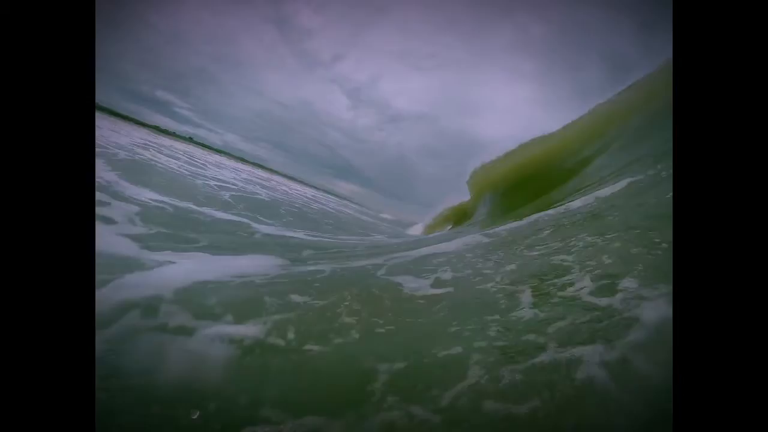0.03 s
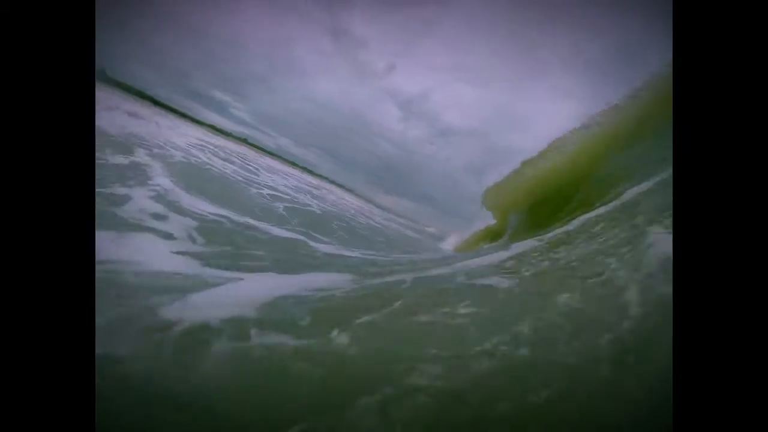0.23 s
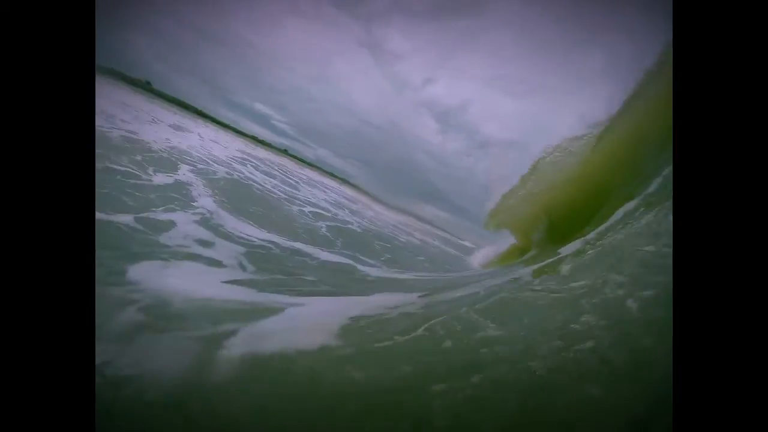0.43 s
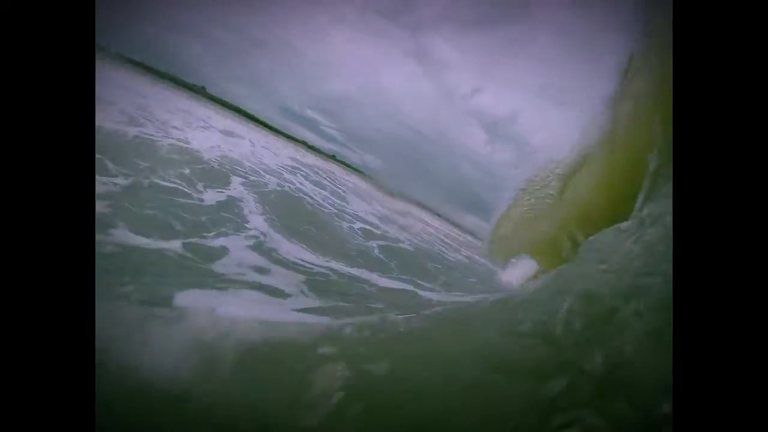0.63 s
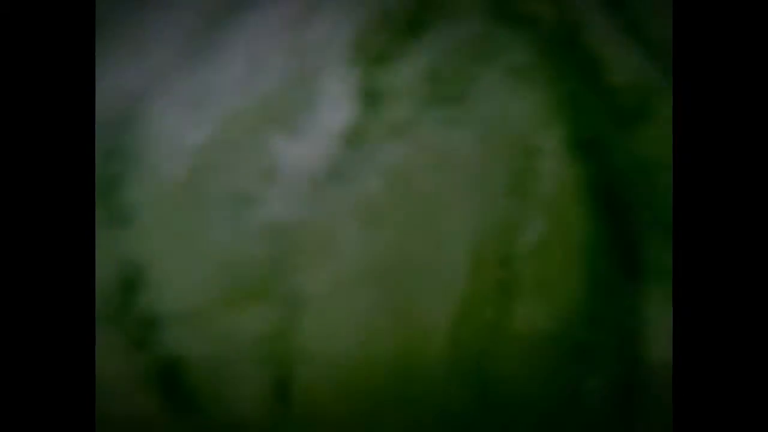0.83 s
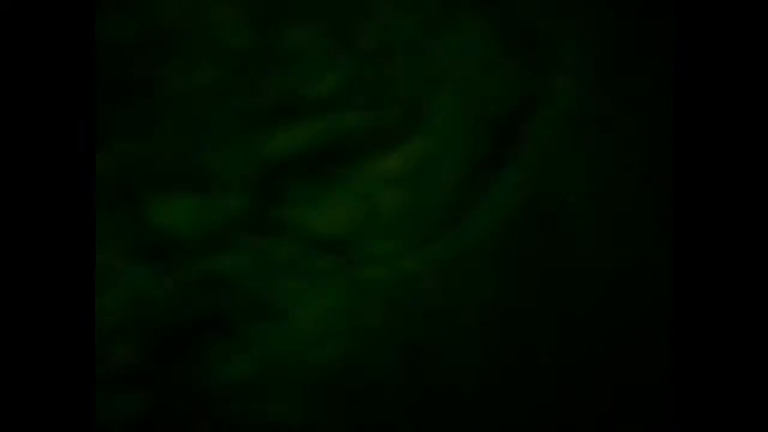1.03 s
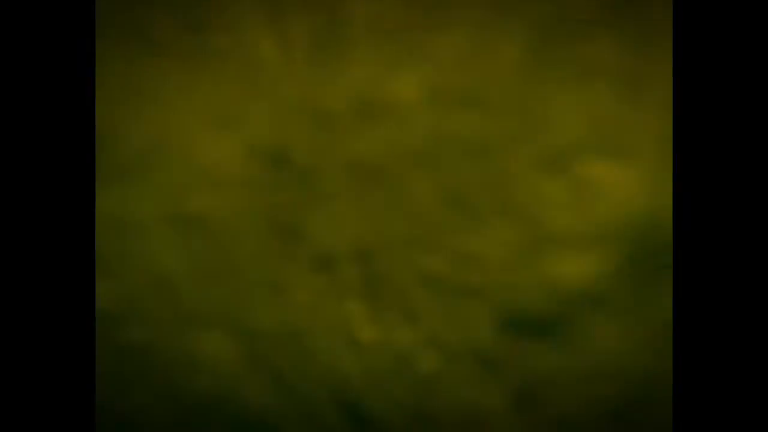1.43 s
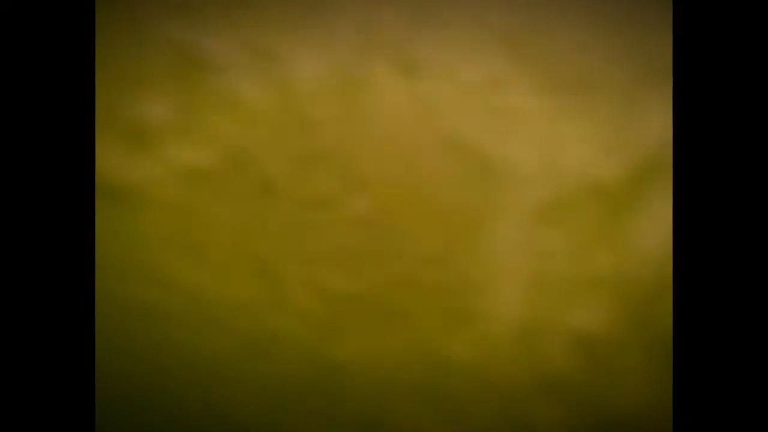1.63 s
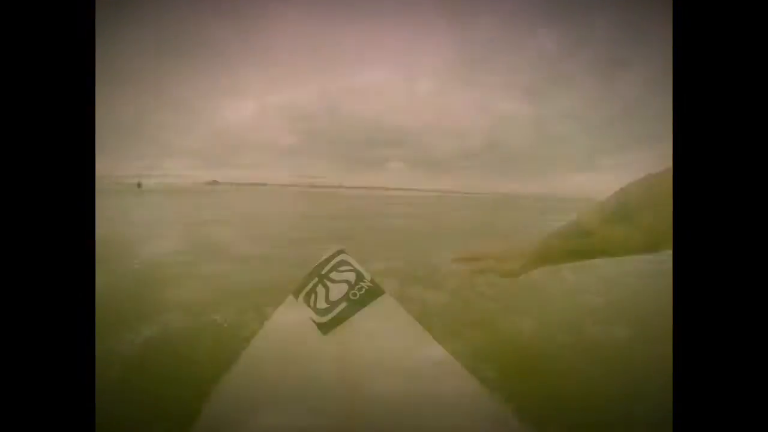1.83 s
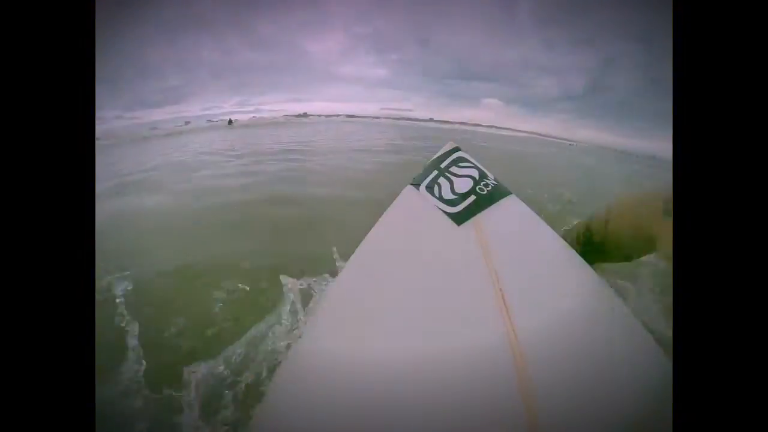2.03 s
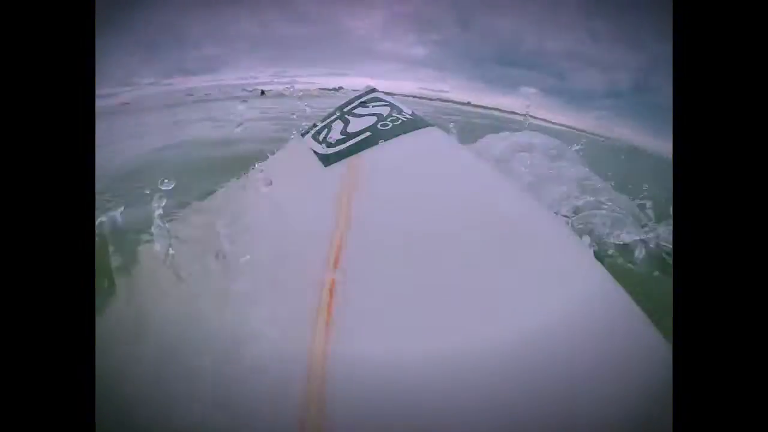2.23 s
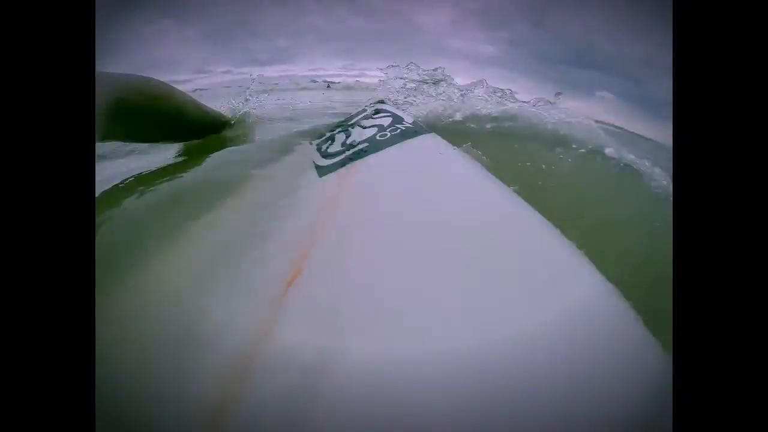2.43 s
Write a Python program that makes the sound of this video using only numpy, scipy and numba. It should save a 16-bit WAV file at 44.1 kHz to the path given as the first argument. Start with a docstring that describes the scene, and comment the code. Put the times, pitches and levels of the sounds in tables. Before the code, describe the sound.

Water rushes and gurgles around a camera on a surfboard. It starts with soft lapping and a slap at 0.25 seconds. From 0.7, sharp slaps hit the case and a muffled, bubbling rush takes over, with a deep boom near 1.1. Big air pockets gurgle from 1.6 to 1.8. After 2 seconds it is quieter at the surface: foam fizzes, drops splash and wind flutters lightly until about 2.6.

```python
"""Surfboard under a wave

A camera in a waterproof case rides a surfboard under a wave and comes up again.
Water laps, slaps the case and closes over it in a muffled rush of ringing bubbles.
Pressure makes the case boom, and big air pockets gurgle as it rises.
In the open air, foam fizzes, drops splash and wind flutters against the case."""
import sys
import numpy as np
from scipy import signal
from scipy.fft import rfft, irfft
from scipy.io import wavfile
from scipy.ndimage import uniform_filter1d
from numba import njit

SR = 44100
rng = np.random.default_rng(int(sys.argv[2]) if len(sys.argv) > 2 else 0)


def generate_wav(sig):
    """Save sig (samples, or channels by samples) to the path in sys.argv[1] as 16-bit PCM at SR."""
    pcm = np.round(np.clip(np.atleast_2d(sig).T, -1, 1) * 32767).astype(np.int16)
    wavfile.write(sys.argv[1], SR, pcm)


N = 114660  # 2.6 s
BASS_EDGE_HZ, TREBLE_EDGE_HZ = 398, 1696
# tone of the spray that goes with slaps and pings: f/Hz, relative level/dB
SPRAY_TONE = [(200, -12.5), (900, 12.5), (2500, -4.5), (4000, -14), (7000, -30)]


def undb(db):
    """Turn decibels into a gain to multiply by."""
    return 10 ** (np.asarray(db) / 20)


def unit(x):
    """Scale a sound to an average strength (rms) of 1."""
    return x / np.sqrt(np.mean(x ** 2))


def curve(rows, column=1):
    """Gain over time, from one dB column of a table."""
    rows = np.array(rows)
    return undb(np.interp(np.arange(N) / SR, rows[:, 0], rows[:, column]))


def freqs():
    """The frequency in Hz of each point of a spectrum."""
    return np.maximum(np.arange(N // 2 + 1) * SR / N, 1)


def below(hz, steepness=6):
    """Filter gains that let through what lies below hz."""
    return 1 / (1 + (freqs() / hz) ** steepness)


def colour(x, tone):
    """Filter a sound by a table of f/Hz, level/dB, then scale it to strength 1."""
    hz, db = np.array(tone).T
    gain = undb(np.interp(np.log(freqs()), np.log(hz), db))
    return unit(irfft(rfft(x) * gain, N))


@njit
def ring(start, hz, cycles, size):
    """Each bubble rings as a fading tone whose pitch rises a little."""
    out = np.zeros(N)
    for k in range(len(start)):
        first = int(start[k])
        decay_samples = cycles[k] * SR / hz[k]
        for i in range(min(int(5 * decay_samples), N - first)):
            age = i / decay_samples
            level = size[k] * np.exp(-age) * (1 - np.exp(-5 * age))
            out[first + i] += level * np.sin(2 * np.pi * cycles[k] * age * (1 + .012 * age))
    return out


def cloud(per_s, cycles, spread_db, top_hz):
    """A swarm of bubbles, equally many in each octave and few of them loud, over churning water."""
    low_hz = 68.53
    churn = rng.standard_normal(N)
    when, pitch, life, size, chance = rng.random((50000, 5)).T
    hz = low_hz * (top_hz / low_hz) ** pitch
    size = undb(-spread_db * np.log(1 - .98 * size)) * hz
    on = chance < per_s * N / SR / len(chance)
    bubbles = ring(when[on] * N, hz[on], cycles * (.5 + life[on]), size[on])
    swarm = unit(bubbles) + undb(-2.5) * churn
    return irfft(rfft(swarm) / np.hypot(1, (low_hz / freqs()) ** 2), N)  # thin out the deepest bass


def pops(per_s, cycles, low_hz, high_hz, db):
    """Lone bubbles ring out of the swarm, each with a clear pitch."""
    when, pitch, size, chance = rng.random((3000, 4)).T
    hz = low_hz * (high_hz / low_hz) ** pitch
    on = chance < per_s * N / SR / len(chance)
    bubbles = ring(when[on] * N, hz[on], np.full(on.sum(), float(cycles)), (size ** 2 * hz)[on])
    return undb(db) * unit(bubbles)


def splashes(rows, spray_tone, rise_s=.0011):
    """Each splash briefly rings an air pocket and throws a spray, finer for a smaller pocket."""
    out = np.zeros(N)
    hiss = colour(rng.standard_normal(N), spray_tone)
    for at, hz, db, decay_s, spray_db in rows:
        near = slice(int((at - .02) * SR), min(int((at + .12) * SR), N))
        t = np.arange(N)[near] / SR - at
        body = undb(db) * pulse(t, rise_s, decay_s)
        tail = undb(db - 7.5) * pulse(t, rise_s, decay_s=.009)
        bend = 1 + .047 * np.tanh(t / decay_s / 2)  # the pitch slides up a little
        spray = signal.lfilter(*signal.butter(2, .6 * hz, "high", fs=SR), hiss[near])
        out[near] += body * np.sin(2 * np.pi * hz * t * bend)
        out[near] += spray * undb(spray_db) * (body + tail)
    return out


def pulse(t, rise_s, decay_s):
    """A level that climbs quickly until t = 0, then dies away."""
    return np.exp(-(np.minimum(t, 0) / rise_s) ** 2 - np.maximum(t, 0) / decay_s)


def muffle(x):
    """Water against the case takes away the highest treble."""
    return irfft(rfft(x) * (undb(-57.5) + below(7400, steepness=30)), N)


def wind():
    """Air flutters against the case once it is out of the water."""
    # tone of the wind, applied twice: f/Hz, relative level/dB
    tone = [(8, -11.5), (44, 1), (60, 0), (90, -10.5), (200, -32), (2000, -59.5)]
    # gusts: t/s, level/dB
    gusts = [(2.0, -68), (2.17, -32.5), (2.25, -37.5), (2.32, -24), (2.45, -33), (2.5, -27), (2.56, -32)]
    eddies = colour(rng.standard_normal(N), tone)
    steadier = eddies / np.sqrt(np.abs(signal.hilbert(eddies)))  # even out chance peaks
    return colour(steadier, tone) * curve(gusts)


def foam():
    """Foam bubbles fizz in the open air behind the wave."""
    # tone of the fizz: f/Hz, relative level/dB
    tone = [(100, -18), (250, -18), (480, 4), (800, -9), (1400, -9), (2200, -1), (3000, -13), (4400, -18.5),
            (5300, -11), (7000, -23), (9300, -27.5), (11500, -32), (14500, -42)]
    # loudness of the fizz: t/s, level/dB
    levels = [(1.7, -91), (1.83, -54.5), (2.05, -52), (2.14, -42), (2.22, -46.5), (2.33, -44.5),
              (2.46, -44.5), (2.53, -40), (2.6, -45.5)]
    fizz = cloud(per_s=3600, cycles=1.4, spread_db=4.4, top_hz=16500)
    fizz += pops(per_s=259.5, cycles=12, low_hz=1199, high_hz=8996.5, db=-9.5)
    return colour(fizz, tone) * curve(levels)


def drops():
    """Drops land on the surface in small, bright splashes."""
    # drops: t/s, f/Hz, peak level/dB, decay/s, spray relative to the peak/dB
    landings = [(2.011, 1820, -32.5, .003, -6.5), (2.14, 5840, -42, .003, 12),
                (2.261, 2070, -31.5, 0.0054, -1.5), (2.2625, 4690, -30, .0012, -13),
                (2.273, 1900, -31, 0.0028, -27), (2.521, 1780, -37.5, .0014, 5.5),
                (2.532, 7200, -29.5, 0.00092, 6), (2.533, 2530, -31.5, 0.0024, -3),
                (2.551, 2330, -23, 0.0025, -13)]
    # tone of their spray: f/Hz, relative level/dB
    tone = [(300, -2), (2200, 12.5), (3700, -5), (5200, -15), (8000, -13.5), (15000, -37)]
    return splashes(landings, tone, rise_s=.00053)


def lapping():
    """Water burbles along the board before the dive and grows louder as the wave nears."""
    # tone of the burbling: f/Hz, relative level/dB
    tone = [(70, -0.5), (150, 2), (260, -0.5), (450, -10.5), (600, -14), (800, -20), (1100, -11.5),
            (1500, -27), (2100, -28.5), (2800, -29.5), (4000, -40), (6000, -49), (7000, -53.5)]
    # loudness of the burbling: t/s, bass level/dB, upper level/dB
    levels = [(0, -42, -47), (.2, -37.5, -46), (.29, -38.5, -41.5), (.36, -35, -40.5), (.48, -35, -44),
              (.56, -37.5, -39.5), (.62, -38.5, -40.5), (.68, -29.5, -35.5), (.8, -66, -69)]
    bubbles = cloud(per_s=6700, cycles=3.5, spread_db=1.6, top_hz=7350)
    bubbles += pops(per_s=100.5, cycles=3.5, low_hz=1001.5, high_hz=6503, db=-14.5)
    water = colour(bubbles, tone)
    bass = irfft(rfft(water) * below(BASS_EDGE_HZ), N)
    return unit(bass) * curve(levels) + unit(water - bass) * curve(levels, column=2)


def case():
    """The case rumbles in the flow, sways with the swell and booms under blows of pressure."""
    # shaking by the flow: t/s, level/dB
    shaking = [(0, -40.5), (.5, -42.5), (.76, -23.5), (.84, -42), (.91, -27.5), (1.0, -33.5), (1.4, -32.5),
               (1.8, -44), (2.1, -35), (2.25, -61)]
    # slow pressure sway of the swell: t/s, level/dB
    sway = [(0, -31), (.35, -30), (.65, -14.5), (.8, -31), (2.0, -42)]
    # tone of the sway: f/Hz, relative level/dB
    sway_tone = [(6, -30), (13, 4.5), (20, -3.5), (30, -26), (100, -63.5), (400, -120)]
    # pressure blows: t/s, f/Hz, level/dB
    blows = [(0.223, 22, -12), (1.119, 35.8, -4.5)]
    ring_hz, width_hz, top_hz = 36.8, 3.3, 67
    decay_s, tail_s = .04, .088
    f = freqs()
    resonance = 1 / (1 + 1j * (f / ring_hz - ring_hz / f) * ring_hz / width_hz)
    resonance /= np.hypot(1, (f / top_hz) ** 3)
    rumble = unit(irfft(rfft(rng.standard_normal(N)) * resonance, N))
    out = rumble * curve(shaking) + colour(rng.standard_normal(N), sway_tone) * curve(sway)
    for at, hz, db in blows:
        t = np.maximum(np.arange(N) / SR - at, 0)
        fade = np.exp(-t / decay_s) + undb(-17) * np.exp(-t / tail_s)
        out += undb(db) * fade * np.sin(2 * np.pi * hz * t)
    return out


def gurgles():
    """Large air pockets wobble and glide in pitch as they slide past the case."""
    # air pockets: t/s, f/Hz, peak level/dB, decay/s, glide/(octaves per s)
    pockets = [(.198, 232, -22.5, 0.0081, -3), (.325, 269, -30.5, 0.0068, .5),
               (0.428, 243.5, -20.5, 0.0131, 4.5), (1.602, 444.4, -15.5, 0.021, -5.5),
               (1.631, 262, -13.5, 0.08, 0), (1.622, 335, -18, 0.043, -1.5), (1.668, 304, -14.5, 0.022, -1),
               (1.655, 137.4, -20, 0.013, 10.5), (1.693, 421.3, -14, 0.039, -0.3),
               (1.739, 203.2, -19.5, 0.078, -0.5), (1.822, 430.3, -23, .041, -2),
               (2.049, 230, -22.5, .0049, -3.5)]
    out = np.zeros(N)
    for at, hz, db, decay_s, glide in pockets:
        t = np.arange(N) / SR - at
        wobble = unit(uniform_filter1d(rng.standard_normal(N), size=500))
        pitch = hz * 2 ** (glide * np.clip(t, -decay_s, 3 * decay_s)) * (1 + .0359 * wobble)
        level = undb(db) * pulse(t, rise_s=.0073, decay_s=decay_s)
        out += level * np.sin(2 * np.pi * np.cumsum(pitch) / SR)
    return out


def pings():
    """Single bubbles ping close to the case inside the rush."""
    # nearby bubbles: t/s, f/Hz, peak level/dB
    bubbles = [(.835, 3920, -29), (.8873, 5940, -36), (0.9349, 1360, -13), (0.986, 3330, -25.5),
               (1.0085, 1830, -26), (1.03, 1140, -14), (1.204, 2670, -27), (1.328, 2470, -27),
               (1.3401, 1880, -27), (1.381, 300, -14), (1.409, 363, -12.5), (1.495, 3500, -28),
               (1.615, 2470, -22.5), (1.661, 2590, -21), (1.677, 640, -15.5), (1.702, 1800, -19.5),
               (1.715, 4340, -32), (1.762, 1910, -18.5), (1.901, 2490, -18), (1.915, 1060, -16),
               (1.967, 1960, -24.5), (2.111, 980, -27)]
    decay_s, spray_db = .0022, -14
    return splashes([(*row, decay_s, spray_db) for row in bubbles], SPRAY_TONE)


def slaps():
    """Water slaps the case, and each slap rings a pocket of air."""
    # slaps: t/s, f/Hz, peak level/dB, decay/s, spray relative to the peak/dB
    hits = [(.248, 1220, -12.5, 0.0015, -18), (.2513, 1550, -22, 0.0014, -27),
            (.2566, 3370, -28.5, 0.001, 5.5), (.2574, 2830, -27.5, 0.0017, -4),
            (.553, 1050, -30, 0.0048, -25), (.6915, 670, -19.5, 0.0024, -3),
            (.697, 1340, -8.5, 0.0027, -15), (.702, 3530, -21.5, .0012, -17),
            (.7035, 2420, -6, 0.0014, -34), (.7245, 1100, -8.5, 0.0017, -5.5),
            (.728, 1030, -7.5, .0037, -26), (.731, 990, -5.5, 0.0035, -24),
            (.732, 2340, -6.5, .0011, -10.5), (.744, 998, -4.5, 0.0032, -6),
            (.7442, 3700, -13, 0.00044, -13), (.7483, 6000, -28, .0013, 1), (.749, 587, -6, 0.013, -24.5),
            (.753, 1134, -8.5, .0034, -29), (.7585, 1810, -3, 0.001, -8), (.7768, 2870, -20.5, .0015, -24),
            (.7795, 785, -3, 0.0049, -18), (.786, 2510, -11, 0.0046, -6.5), (.786, 1160, -13.5, .0029, -19),
            (.798, 3000, -24, .003, 3), (.802, 2340, -14.5, 0.0051, -3), (.805, 5615, -33.5, .0008, 8),
            (.909, 807, -9.5, 0.0071, -17), (.929, 149, -11, 0.0092, -21), (.984, 807, -8.5, 0.0054, -24.5),
            (1.461, 758, -6, 0.0048, -26), (1.701, 760, -15, 0.0076, -21)]
    return splashes(hits, SPRAY_TONE)


def rush():
    """The wave's cloud of bubbles: large, middling and small ones surge separately."""
    # tone of the rush: f/Hz, relative level/dB
    tone = [(70, 1.5), (120, 1), (250, -2.5), (420, -6.5), (560, -12), (780, -8), (1100, -11),
            (1500, -18.5), (2000, -20.5), (2700, -22.5), (3600, -26.5), (4700, -37.5), (6000, -40.5),
            (7000, -45.5)]
    # the wave closing over, before trim_db is added: t/s, bass/dB, middle/dB, treble/dB
    closing = [(.6, -78, -91, -95), (.69, -19, -33.5, -54), (.745, -18, -14.5, -32), (.77, -24, -14, -38)]
    # the surges under water that follow: same columns
    surges = [(0.81, -27.5, -20, -34), (0.848, -24, -15, -27), (0.922, -10, -14, -28),
              (1.002, -26.5, -19, -26.5), (1.114, -22.5, -20.5, -32), (1.172, -38.5, -30, -40.5),
              (1.4, -27, -23, -34), (1.498, -29, -22.5, -36.5), (1.526, -30.5, -28, -38.5),
              (1.626, -17.5, -23, -32.5), (1.645, -19, -32, -42.5), (1.716, -19.5, -20, -29),
              (1.866, -24, -29, -39.5), (1.912, -23, -24, -46), (2.06, -28, -39.5, -46.5),
              (2.2, -45.5, -46, -44.5)]
    trim_db = (-3, -3, -7.5)  # bass, middle, treble
    bubbles = cloud(per_s=5000, cycles=1.99, spread_db=3, top_hz=7650)
    bubbles += pops(per_s=307, cycles=9, low_hz=599, high_hz=6499.5, db=-6)
    spectrum = rfft(colour(bubbles, tone))
    bass, below_treble = below(BASS_EDGE_HZ), below(TREBLE_EDGE_HZ)
    out = np.zeros(N)
    for k, band in enumerate((bass, below_treble - bass, 1 - below_treble)):
        level = undb(trim_db[k]) * curve([*closing, *surges], column=k + 1)
        out += level * unit(irfft(spectrum * band, N))
    return out


def scene():
    """Muffled water and the booming case first, then the brighter surface, in one channel."""
    slapping, dripping = slaps(), drops()
    underwater = muffle(slapping + pings() + lapping() + rush() + case())
    return (underwater + gurgles() + foam() + dripping + wind())[None]


def record(dry):
    """The camera clips peaks at full scale and cuts the very highest treble."""
    top_hz = 15600
    treble_cut = signal.ellip(8, .2, 70, top_hz, fs=SR, output="sos")
    return signal.sosfilt(treble_cut, np.clip(dry, -1, 1))


dry = scene()
out = record(dry)
generate_wav(out)
```